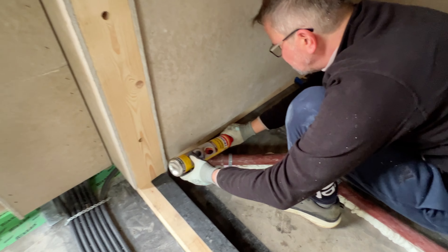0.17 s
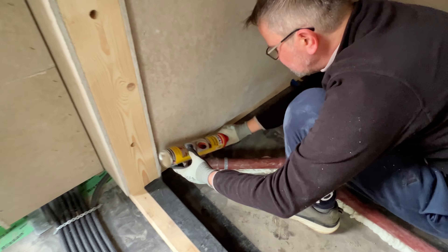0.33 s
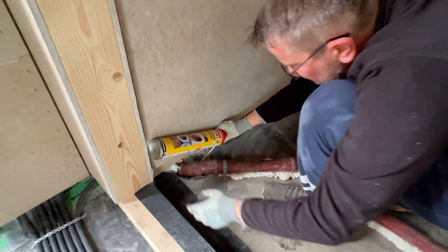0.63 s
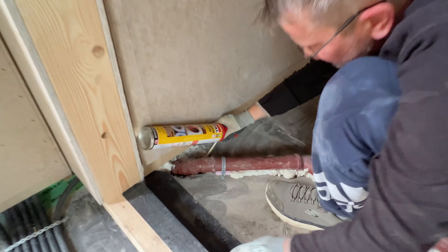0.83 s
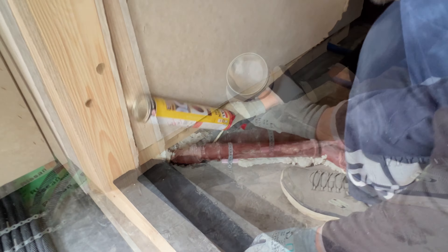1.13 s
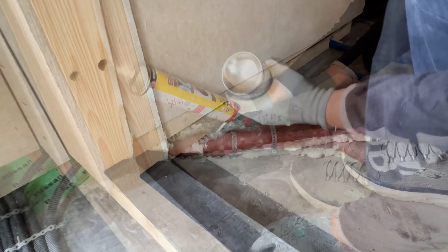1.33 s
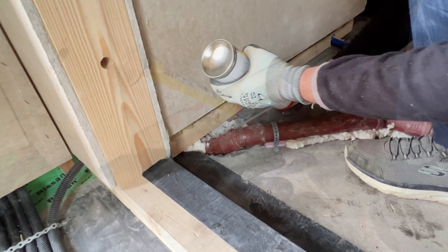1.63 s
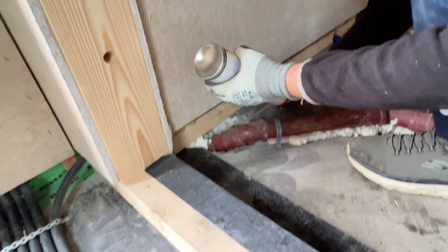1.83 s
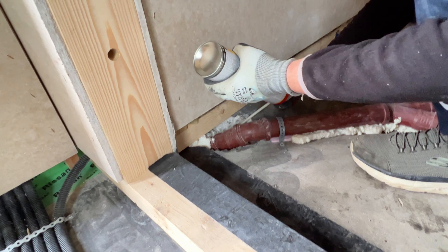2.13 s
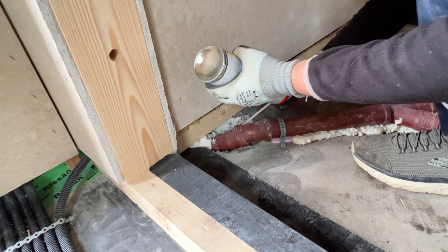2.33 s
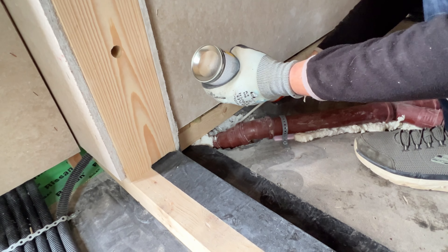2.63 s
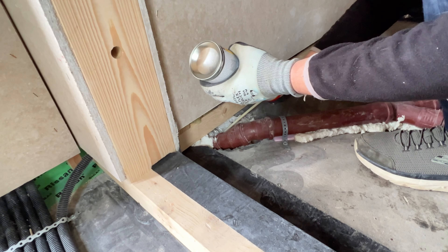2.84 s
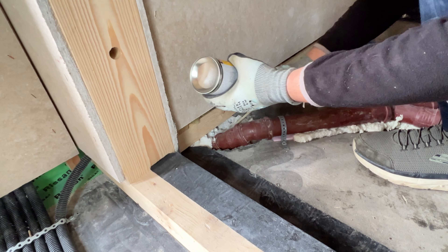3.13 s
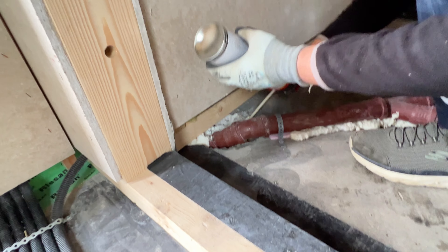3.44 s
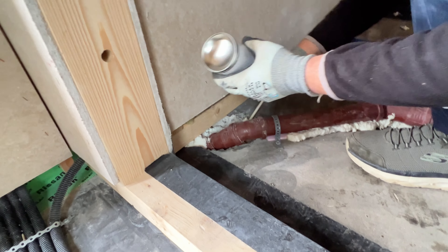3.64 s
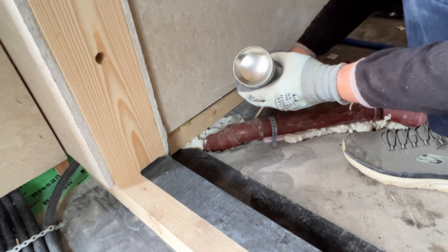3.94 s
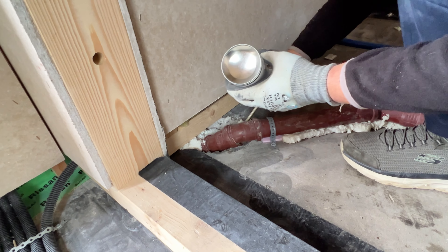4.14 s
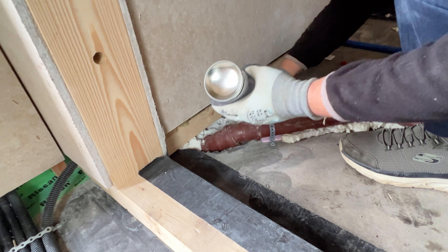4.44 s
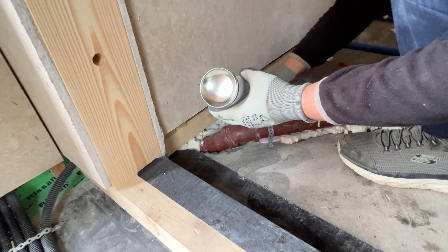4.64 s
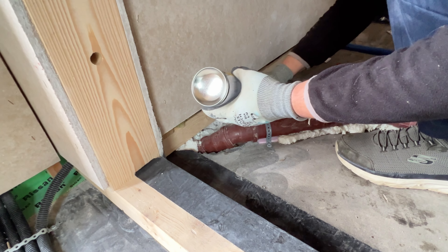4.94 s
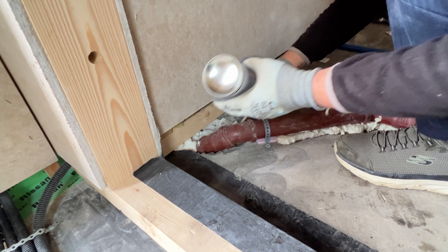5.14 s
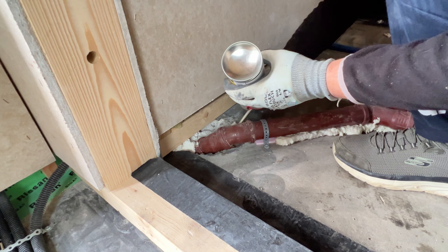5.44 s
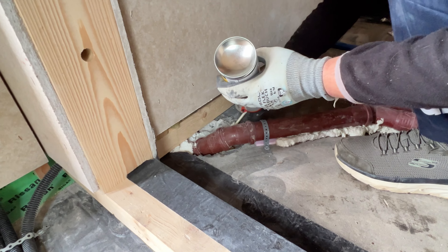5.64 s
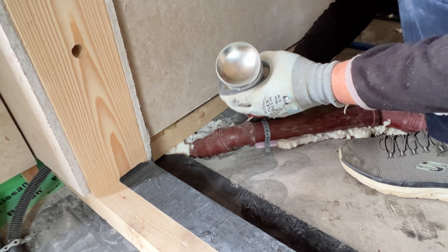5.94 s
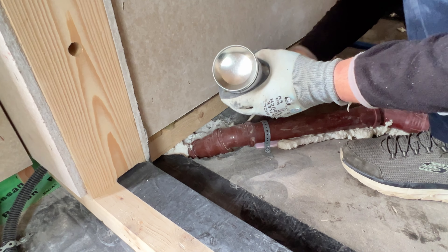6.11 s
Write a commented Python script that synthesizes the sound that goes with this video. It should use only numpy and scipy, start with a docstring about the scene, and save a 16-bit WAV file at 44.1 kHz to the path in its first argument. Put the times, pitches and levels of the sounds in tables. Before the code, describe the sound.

Close stereo pickup of foam squirting from a can into a floor corner of a bare wooden room. A soft, muffled gurgling opening fades into a fuller hissing jet with a small bump, then come a short forceful spurt, a medium one, a long one and a duller last one. Wet plops mark restarts; fresh foam crackles in the gaps over faint low hum.

```python
"""Jet of expanding foam from a can, through a straw into a floor corner of a bare wooden room, in bursts.
Six noise parts (rumble, gurgle, ring, rush, gas, sizzle) follow a trigger table through dB laws;
resonances of straw and corner colour them. The first burst fades out before the rest.
Chirped plops, decaying noise puffs (snaps, knocks, a tick) and random foam crackle join in.
A short room tail follows jet, plops, knocks and tick; low hum, made of coloured noise, lies under all."""
import sys
import numpy as np
from scipy import signal
from scipy.fft import rfft, irfft, next_fast_len
from scipy.io import wavfile
from scipy.ndimage import uniform_filter1d

SR = 44100
rng = np.random.default_rng(int(sys.argv[2]) if len(sys.argv) > 2 else 0)


def nominal_scale(level):
    """Amplitude ratio for a level in decibels (scalar or array-like)."""
    x = np.asarray(level, float) / 20
    return 10 ** x


def transcribe(signal):
    """Save signal, clipped to [-1, 1], as a 16-bit WAV file at the path in sys.argv[1]."""
    frames = np.atleast_2d(signal).T
    limited = np.clip(frames, -1, 1)
    pcm = np.round(limited * 32767).astype(np.int16)
    wavfile.write(sys.argv[1], SR, pcm)


N = 276505
SIZE = next_fast_len(N + SR)
HZ = np.fft.rfftfreq(SIZE, 1 / SR)
T = np.arange(N) / SR

# trigger finger, one table a straw position: t/s, flow/dB, gas against foam/dB, share ringing in corner/dB
TRIGGER = [
    [(0.0, -32.5, -15, -3), (0.162, -32.5, -15.5, -5), (0.238, -29, -6.5, -2), (0.322, -29, -10, -1.5),
     (0.352, -29, -7.5, -6), (0.46, -34, -11.5, -6), (0.464, -33.5, -15, -4.5), (0.518, -33.5, -13.5, -8.5),
     (0.57, -27, -8.5, -3.5)],
    [(0.57, -31.5, -6, -17), (0.586, -20, -14, -5.5), (0.608, -26.5, -13, -8.5), (0.638, -22.5, -10, -4),
     (0.736, -25, -16.5, -6.5), (0.82, -25.5, -8, -7.5), (0.928, -25.5, -17.5, -7),
     (1.304, -30.5, -11.5, -6.5), (1.34, -29.5, -15.5, -5)] + [(1.35, -27.5, -18.5, -4),
     (1.66, -39.5, -17, -5), (1.75, -47.5, -18, -7.5), (1.794, -83, -14, -9), (1.88, -73, 7, -11)],
    [(1.88, -66, 8, 0), (1.9, -71, 3, -7), (1.94, -26, -21, -10.5), (1.952, -28.5, -14, -1.5),
     (1.986, -15, -22, -7.5), (2.014, -22, -21, -6.5), (2.086, -18.5, -10.5, -3),
     (2.17, -24.5, -16.5, -7.5), (2.216, -40.5, -12.5, -3.5), (2.504, -56, -12, 5.5), (2.66, -63.5, -1, 1)],
    [(2.66, -76, 2.5, -5.5), (2.694, -40, -10.5, -13), (2.758, -27.5, -12.5, -10.5),
     (2.812, -24.5, -1.5, -3), (2.98, -24, -11, 1.5), (3.042, -24.5, -17, -5), (3.2, -24, -19.5, -5),
     (3.258, -22.5, -22, -2.5), (3.394, -28, -14, -9.5), (3.462, -47, -11.5, -10.5), (3.566, -54.5, -14, 1),
     (3.694, -59, -9.5, 2), (3.7, -69, 5.5, -4.5)],
    [(3.7, -64.5, -2, 0), (3.754, -67, 6, 1), (3.78, -45, -12.5, -17), (3.814, -48, -4, -19.5),
     (3.834, -36.5, -15.5, -17), (3.93, -27, -13, -11)] + [(3.95, -20.5, -8.5, -7.5), (4.0, -19.5, -14, -4),
     (4.108, -21, -12, -4.5), (4.2, -20, -21, -4), (4.33, -25, -18, -4.5), (4.578, -24, -28.5, -2),
     (4.72, -27, -15.5, -4.5), (4.792, -22.5, -18, -5), (4.908, -27.5, -22, -14.5), (5.17, -63, -17, -0.5),
     (5.246, -65, 6, 4), (5.255, -53, -13, -2)],
    [(5.255, -42, -15, -3), (5.273, -36.5, -16, -16.5), (5.341, -33, -17, -12), (5.455, -25.5, -25.5, -0.5),
     (5.607, -27, -26.5, -4), (5.629, -27, -24.5, -4), (5.855, -28.5, -23, -5), (5.943, -25.5, -31, -7),
     (5.985, -32, -34, -3), (6.051, -52.5, -29.5, -16), (6.205, -64, -18, 13.5), (6.27, -80, -17, -1)],
]
# straw and corner resonances, one table a position: f/Hz, width/Hz, lift over plain colour/dB
CORNER_MODES = [
    [(173, 35, 9.5), (299, 32, -11.5), (462, 10, 17.5), (800, 240, 7), (1020, 32, 5.5), (1596, 220, 6.5),
     (2060, 120, 7), (2825, 33, 9)],
    [(180, 65, 9), (277, 98, -17.5), (438.5, 20, 11), (525, 86, -7), (661, 270, 6), (910, 160, 0.5),
     (1140, 34, 6), (1313, 11.5, 6.5), (1536, 46, 8.5), (2040, 24, 4.5)],
    [(238, 260, -5.5), (489, 33, 9.5), (625, 52, -3.5), (917, 50, 2.5), (1000, 150, 3), (2300, 200, 2),
     (3080, 790, 6.5), (3550, 260, -5.5)],
    [(380, 40, 1), (464, 31, 3.5), (610, 140, 5), (948, 59, 3), (1010, 17, 13), (1550, 140, 2.5),
     (2300, 62, 3.5), (3020, 180, 4.5)],
    [(345, 88, 1.5), (494, 31, 4.5), (610, 60, 2), (1036, 19, 6.5), (1130, 100, -4), (1670, 31, -12),
     (1845, 14, -4), (2270, 11, 8), (2960, 26, -0.5)],
    [(246, 30, 9), (430, 51, -5), (720, 32, 2), (1070, 110, 3.5), (1180, 31, -11), (1330, 55, -0.5),
     (1960, 420, 3), (2550, 140, 5.5), (3380, 940, -1)],
]
# what each straw position favours: ring f/Hz, ring width/Hz, rumble/dB, rush/dB, sizzle/dB
PLACES = [(1370, 940, -4, 0, 2.5), (1242, 290, -7.5, 0.5, -4), (1000, 920, -7.5, -4, -0.7),
          (1075, 530, -4.5, -2, 4), (1136, 290, -4, 1.34, -0.5), (1152, 640, 0.5, 1, 4.5)]
# ring shift as the straw moves and the gap fills, one value a position: drift/(Hz/s)
RING_DRIFT_HZ_PER_S = [196, -220, 150, 221.5, -150, 44]

USUAL_FLOW_DB, USUAL_GAS_DB, USUAL_RING_DB = -27, -15, -5
FULL_RING_DB = -2.5  # the ring share counts no further
# laws of the jet parts: level at usual state/dB, then slopes/(dB/dB) on flow, gas, ring share
RUMBLE_LAW = (-49, .85, -.2, -.4)
GURGLE_LAW = (-32, 1.0249, -0.1944, -0.56)
RING_LAW = (-31.5, 0.9638, -0.08, 1.73)
RUSH_LAW = (-33, 1.09, 0.5139, 0.6)
GAS_LAW = (-40.5, 1.08, 1.2, -0.27)
SIZZLE_LAW = (-56, 1.55, 1.15, -0.5)
RUSH_HZ, RUSH_HZ_PER_DB = 2132, 35  # more gas, higher rush

# colours of the jet parts: f/Hz, relative gain/dB
RUMBLE_COLOUR = [(30, -55), (60, -26.5), (100, 6.5), (130, 11.5), (180, -0.5), (260, -7), (500, -66)]
GURGLE_COLOUR = [(60, -65), (200, -20), (330, -3), (450, -3.5), (620, -0.5), (850, -8), (1400, -14.5),
                 (3000, -53.5)]
RUSH_COLOUR = [(600, -21), (1100, -10), (1600, -0.5), (2600, -6), (3300, -5.5), (4000, -7), (7000, -42.5)]
GAS_COLOUR = [(1500, -56), (3000, 3.5), (4500, 9.5), (6000, 6), (8500, -4.5), (10300, -15), (12000, -33.5)]
SIZZLE_COLOUR = [(6000, -17), (9000, 10), (10300, 6), (11600, 14), (13500, 1.5), (15500, 4), (16500, -55)]

# valve spits thin gas: peak t/s, level/dB
SPITS = [(.148, -48), (.436, -45), (.766, -52), (1.386, -50), (2.052, -35), (2.70, -49), (2.772, -46),
         (2.807, -27.5), (3.40, -50), (3.846, -42), (3.916, -38), (3.955, -43), (5.30, -64)]
SPIT_RISE_DB_PER_S, SPIT_FALL_DB_PER_S = 402, 448.5
# heavy foam slug heaves in the straw: peak t/s, level/dB
HEAVES = [(.346, -46), (2.01, -41), (2.194, -47), (3.34, -43), (4.396, -45), (4.582, -44), (4.962, -50),
          (5.409, -53), (5.533, -52), (5.867, -40.5)]
HEAVE_RISE_DB_PER_S, HEAVE_FALL_DB_PER_S = 251, 220
# air rush surges as a gas pocket passes: peak t/s, level/dB
SURGES = [(.15, -40), (.56, -33), (.882, -30.5), (1.21, -34.5), (1.31, -36.5), (2.84, -32.5), (2.99, -33),
          (3.25, -34), (3.50, -56), (4.06, -29), (4.184, -23.5), (4.694, -39)]
SURGE_RISE_DB_PER_S, SURGE_FALL_DB_PER_S = 162, 124

# single foam slugs plop out: t/s, level/dB, starting f/Hz
PLOPS = [(1.935, -32, 1010), (1.977, -13, 457), (1.997, -15, 1010), (2.688, -40, 368), (2.758, -32, 610),
         (3.85, -27.5, 606), (3.903, -22, 480), (3.926, -18.5, 664), (5.27, -28, 650)]
# bursting bubbles: t/s, level before common lift/dB, left-right/dB
SNAPS = [(1.3846, -29.5, 0.5), (1.4154, -38, 16), (2.3544, -61, 9), (2.3844, -52, -3.5), (2.4014, -57, -31),
         (2.4244, -52, -13), (2.4444, -52, 1.0), (2.4574, -60, 3), (2.4957, -57, -11), (2.5341, -61, -14),
         (2.584, -49, -12), (2.6194, -62, 7), (3.3296, -33, 8.5), (3.5768, -57, 14), (3.6744, -55, 15),
         (3.7933, -41, -2), (5.217, -63.5, 3.5), (5.2649, -49, 4), (6.1394, -73, 0.5), (6.1649, -77, -2.5),
         (6.2065, -75, -3)]
SNAP_T60_S = 0.035
# fresh foam settling: t/s, level/dB
SETTLING = [(1.7, -76), (2.3, -71), (2.7, -69.5), (4, -75), (5.2, -89.5), (6.27, -102)]
# colour of popping foam: f/Hz, relative gain/dB
CRACKLE_COLOUR = [(800, -56), (1500, -25), (4000, -6.5), (7500, -3), (9000, 1.5), (11300, -11),
                  (12500, -13.5), (16000, -18)]
# can or knee bumps the floor: t/s, level before common lift/dB
KNOCKS = [(0.575, -23.5), (0.585, -20)]
# colour of a floor bump: f/Hz, relative gain/dB
KNOCK_COLOUR = [(25, -50), (60, -9), (110, 2), (220, 2.5), (500, -9.5), (800, 1), (1200, -31.5),
                (2500, -71.5)]
# straw touches wood: t/s, level before common lift/dB
TICKS = [(6.165, -42)]
# colour of the straw tick: f/Hz, relative gain/dB
TICK_COLOUR = [(300, -30), (900, -3), (1600, 0), (3000, -5), (6000, -13), (9500, -20), (11000, -45)]

# colour of hum and room air: f/Hz, relative gain/dB
HUM_COLOUR = [(18, -46), (30, -16.5), (76, -5), (117, -11), (177, -36), (373, -19), (991, -20),
              (1220, -15.5), (4290, -44), (6640, -43.5), (7170, -46), (9770, -48), (14000, -60)]
HUM_DB = -54.5
HUM_DIP_S, HUM_DIP_WIDTH_S, HUM_DIP_DB = 1.85, 0.046, -5.5
# room decay: f/Hz, t60/s
ROOM_T60 = [(150, 0.44), (500, 0.31), (2000, 0.38), (6000, 0.17), (12000, 0.2)]
# phase lead of the left microphone port: f/Hz, lead/rad
PORT_LEAD = [(0, 0), (900, .4), (1300, 1.3), (3500, 3.1), (5500, 4.6), (7700, 6.3), (8900, 4.8),
             (9700, 3.2), (10700, 3), (11200, 1), (12500, 0), (13200, -3), (14200, -3.2), (15000, -5.8),
             (16500, -6.3)]
# balance of the ports: f/Hz, left-right/dB
PORT_TILT = [(60, -1), (500, -4), (800, -1), (1100, -1.5), (1350, 1), (2400, -5), (3500, -0.5), (5000, 4),
             (6000, 7), (7200, 9.5), (8100, 5), (9500, 5.5), (10300, -4), (16000, 4)]
# likeness of the ports: f/Hz, likeness/(0-1)
PORT_LIKENESS = [(60, 0.86), (250, 0.88), (500, 0.51), (1100, 0.55), (1700, 1), (2800, 0.23), (4200, 0.35),
                 (5300, 0.19), (7000, 0.19), (9000, 0.41), (9900, 0.98), (16000, 0.26)]


def spray():
    """Foam jet: parts follow flow, gas and ring share by dB laws; each position's resonances colour them."""
    rumble = colour(sputter(30, lump_db=0.7, patchy_db=0.5, streak_db=1.4), RUMBLE_COLOUR)
    gurgle = colour(sputter(83, lump_db=1.0, patchy_db=-0.18, streak_db=2.5), GURGLE_COLOUR)
    rush = colour(sputter(100, lump_db=-2.0, patchy_db=2.5, streak_db=3.0), RUSH_COLOUR)
    jet_noise = sputter(220, lump_db=0.7, patchy_db=2.0, streak_db=2.5)
    gas = colour(jet_noise, GAS_COLOUR)
    sizzle = colour(jet_noise, SIZZLE_COLOUR)
    slugs = sputter(42, lump_db=-1.0, patchy_db=1.5, streak_db=1.5)
    surges = peaks(SURGES, SURGE_RISE_DB_PER_S, SURGE_FALL_DB_PER_S)

    # spits and heaves bypass the corner
    out = peaks(SPITS, SPIT_RISE_DB_PER_S, SPIT_FALL_DB_PER_S) * sizzle
    out += peaks(HEAVES, HEAVE_RISE_DB_PER_S, HEAVE_FALL_DB_PER_S) * rumble
    for rows, modes, place, drift in zip(TRIGGER, CORNER_MODES, PLACES, RING_DRIFT_HZ_PER_S):
        ring_hz, ring_width_hz, rumble_db, rush_db, sizzle_db = place
        s, *columns = np.transpose(rows)
        flow_db, gas_db, ring_db = (np.interp(T, s, c) for c in columns)
        gas_excess_db = gas_db - USUAL_GAS_DB
        ring_excess_db = np.minimum(ring_db, FULL_RING_DB) - USUAL_RING_DB
        state = np.array([np.ones(N), flow_db - USUAL_FLOW_DB, gas_excess_db, ring_excess_db])

        def gain(law, lift_db=0):
            """Level law to linear gain."""
            return nominal_scale(np.dot(law, state) + lift_db)

        ring_path_hz = ring_hz + drift * (np.clip(T, s[0], s[-1]) - s.mean())
        rush_path_hz = np.clip(RUSH_HZ + RUSH_HZ_PER_DB * gas_excess_db, 1600, 2700)
        foam = gain(RUMBLE_LAW, rumble_db) * rumble
        foam += gain(GURGLE_LAW) * gurgle
        foam += gain(RING_LAW) * ring(slugs, ring_path_hz, ring_width_hz)
        air = (gain(RUSH_LAW, rush_db) + surges) * ring(rush, rush_path_hz, 2200)
        air += gain(GAS_LAW) * gas
        air += gain(SIZZLE_LAW, sizzle_db) * sizzle
        jet = (foam + air) * ((T >= s[0]) & (T < s[-1]))
        lift_db = sum(db / (1 + (2 * (HZ - hz) / width) ** 2) for hz, width, db in modes)
        out += irfft(rfft(jet, SIZE) * nominal_scale(lift_db), SIZE)[:, :N]
    return out


def sputter(per_s, lump_db, patchy_db, streak_db):
    """Noise pair in lumps, as slugs leave the straw; broad colour patches drift, narrow streaks linger."""
    lumps = nominal_scale(lump_db * wander(per_s, count=1))
    z = signal.stft(rng.standard_normal((2, N)) * lumps, nperseg=1024, noverlap=768)[2]
    patches, streaks = rng.standard_normal((2,) + z.shape[1:])  # axes: frequency, time
    patches = uniform_filter1d(uniform_filter1d(patches, size=8, axis=1), size=10, axis=0)
    streaks = uniform_filter1d(uniform_filter1d(streaks, size=30, axis=1), size=2, axis=0)
    z *= nominal_scale(patchy_db * evened(patches) + streak_db * evened(streaks))
    return evened(signal.istft(z, nperseg=1024, noverlap=768)[1][:, :N])


def ring(x, hz, width_hz):
    """Resonance along the curve hz: shift to zero, two one-pole low-passes, shift back."""
    turn = np.exp(2j * np.pi * np.cumsum(hz) / SR)
    r = np.exp(-np.pi * width_hz / SR)
    low = signal.lfilter([1 - r], [1, -r], x / turn)
    low = signal.lfilter([1 - r], [1, -r], low)
    return evened((turn * low).real)


def peaks(rows, rise_db_per_s, fall_db_per_s):
    """Gain that climbs to each peak and falls away, linear in dB."""
    return sum(nominal_scale(db + np.minimum(rise_db_per_s * (T - s), fall_db_per_s * (s - T))) for s, db in rows)


def plops(cycles=4.0):
    """Foam slugs: a few sine cycles that swell, rise a little in pitch and die."""
    out = np.zeros(N)
    for s, db, hz in PLOPS:
        turns = np.arange(round(3 * cycles * SR / hz)) * hz / SR
        swell = turns * 3 / cycles
        shape = swell * np.exp(1 - swell)
        tone = np.sin(2 * np.pi * turns * (1 + 0.014 * turns))
        out[round(s * SR):][:len(turns)] += nominal_scale(db) * shape * tone
    return out


def snaps():
    """Bubbles burst: short bright puffs, each on its own side."""
    return burst(SNAPS, CRACKLE_COLOUR, SNAP_T60_S, lift_db=-7)


def burst(rows, tint, t60_s, lift_db):
    """Sudden noise puffs with exponential decay, one a row."""
    t = np.arange(round(t60_s * SR)) / SR
    puffs = rng.standard_normal((len(rows), len(t)))
    out = np.zeros((2, N + len(t)))
    for puff, (s, db, *pan_db) in zip(puffs, rows):
        side = nominal_scale(np.array([[1], [-1]]) * sum(pan_db) / 2)
        out[:, round(s * SR):][:, :len(t)] += nominal_scale(db + lift_db - 60 * t / t60_s) * puff * side
    return colour(out[:, :N], tint)


def crackle():
    """Fresh foam, stronger on the right, pops at random with random sizes while it settles."""
    size_db = 3.0 * np.minimum(rng.exponential(1, N), 3)
    pops = nominal_scale(size_db) * (rng.random(N) < 900 / SR)  # 900 pops/s on average
    level = nominal_scale(np.interp(T, *np.transpose(SETTLING)))
    return level * evened(colour(pops, CRACKLE_COLOUR)) * nominal_scale([[-5], [0]])


def knocks():
    """Can or knee bumps the floor: low noise puffs."""
    return burst(KNOCKS, KNOCK_COLOUR, 0.28, lift_db=-7.5)


def ticks():
    """Straw touches wood: a very short dry puff."""
    return burst(TICKS, TICK_COLOUR, 0.012, lift_db=-5)


def hum():
    """Low machine hum and room air as slowly lumpy coloured noise; the level dips briefly."""
    dip_db = HUM_DIP_DB * np.exp(-((T - HUM_DIP_S) / HUM_DIP_WIDTH_S) ** 2)
    noise = sputter(12, lump_db=-0.2, patchy_db=2.0, streak_db=-0.5)
    return nominal_scale(HUM_DB + dip_db) * colour(noise, HUM_COLOUR)


def room(x):
    """Room tail: sparse taps of random sign, each band dying at its own speed."""
    taps = rng.choice([-1., 1.], (2, SR)) * (rng.random((2, SR)) < 2000 / SR)
    taps[:, :300] = 0
    hz, t, z = signal.stft(taps, SR, nperseg=256)
    decay = nominal_scale(-60 * t / read(ROOM_T60, hz)[:, None])
    tail = signal.istft(z * decay, SR, nperseg=256)[1]
    return signal.fftconvolve(x, tail / np.linalg.norm(tail[0]), axes=1)[:, :N]


def ports(pair):
    """Two microphone ports: mix the pair to a set phase lead, balance and likeness over frequency."""
    direct, other = rfft(pair, SIZE)
    same = np.clip(read(PORT_LIKENESS), 0, 1)
    half_tilt = nominal_scale(read(PORT_TILT) / 2)
    left = direct * np.exp(1j * np.interp(HZ, *np.transpose(PORT_LEAD))) * half_tilt
    right = (same * direct + np.sqrt(1 - same ** 2) * other) / half_tilt
    return irfft(np.array([left, right]), SIZE)[:, :N]


def evened(x):
    """Scales to rms 1."""
    return x / np.sqrt(np.mean(x ** 2) + 1e-20)


def read(points, hz=HZ):
    """Table over frequency, joined on a log axis."""
    f, value = np.transpose(points)
    return np.interp(np.log(hz + 1), np.log(f + 1), value)


def colour(x, points):
    """Filters by a dB table, its gain scaled to mean power 1."""
    return irfft(rfft(x, SIZE) * evened(nominal_scale(read(points))), SIZE)[..., :N]


def wander(cutoff_hz, count):
    """Low-passed noise of rms 1."""
    smooth = signal.butter(2, cutoff_hz, fs=SR, output="sos")
    return evened(signal.sosfilt(smooth, rng.standard_normal((count, N))))


def scene():
    """Jet, plops, knocks, tick, their room tail and hum pass the ports; snaps and crackle keep their sides."""
    near = spray() + plops() + knocks() + ticks()
    wet = nominal_scale(-13) * room(near)
    return ports(near + wet + hum()) + snaps() + crackle()


def roll_off(x):
    """The treble ends steeply here."""
    return signal.sosfilt(signal.butter(12, 17100, fs=SR, output="sos"), x)


def record(dry):
    """The microphone loses the deepest bass: 52 Hz high-pass."""
    low_cut = signal.butter(4, 52, "high", fs=SR, output="sos")
    mix = signal.sosfilt(low_cut, dry)
    return roll_off(mix)


dry = scene()
out = record(dry)
transcribe(out)
```